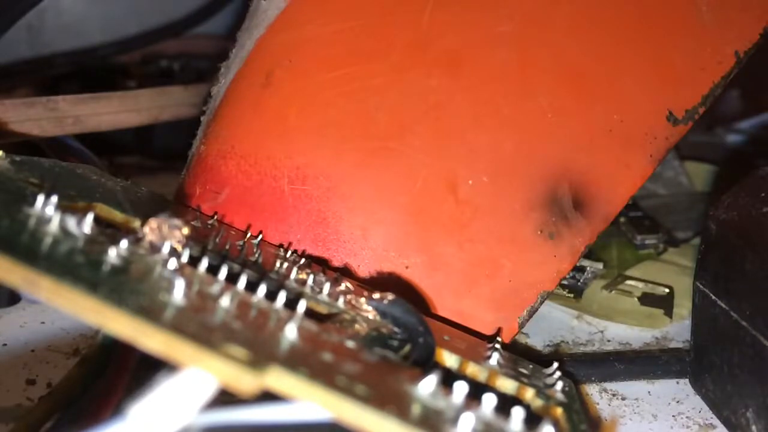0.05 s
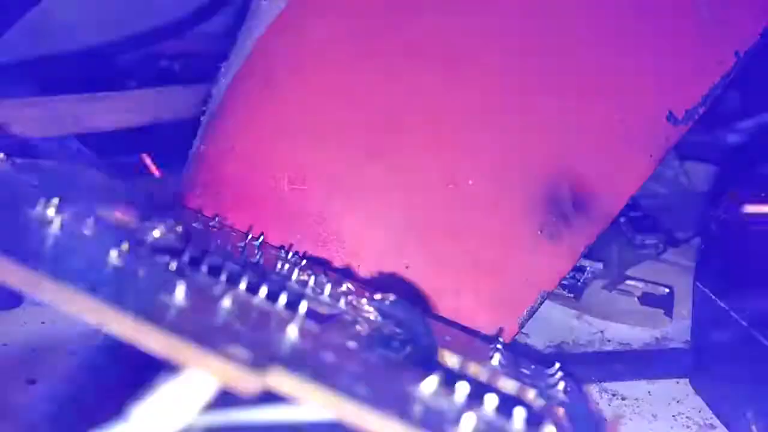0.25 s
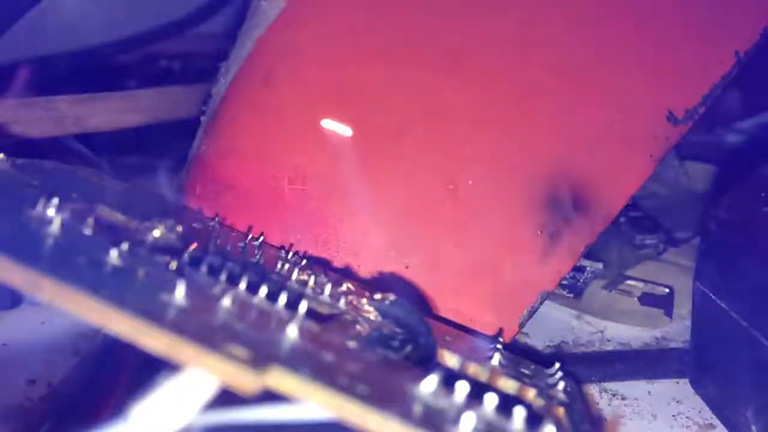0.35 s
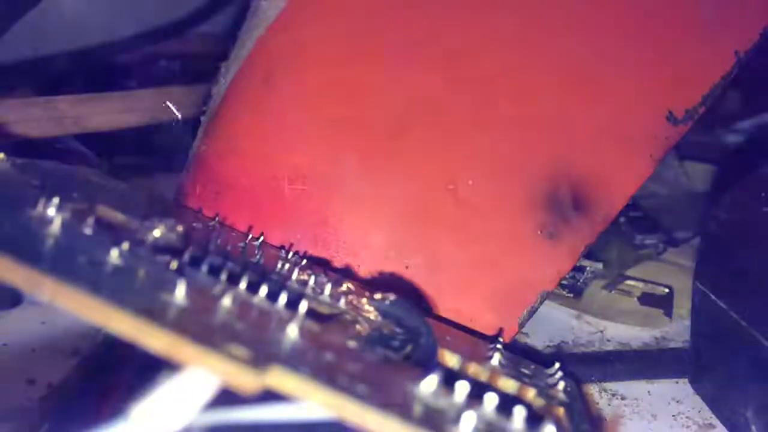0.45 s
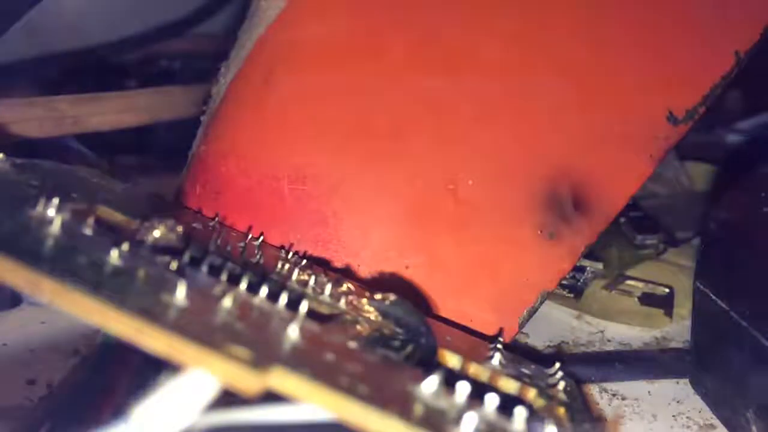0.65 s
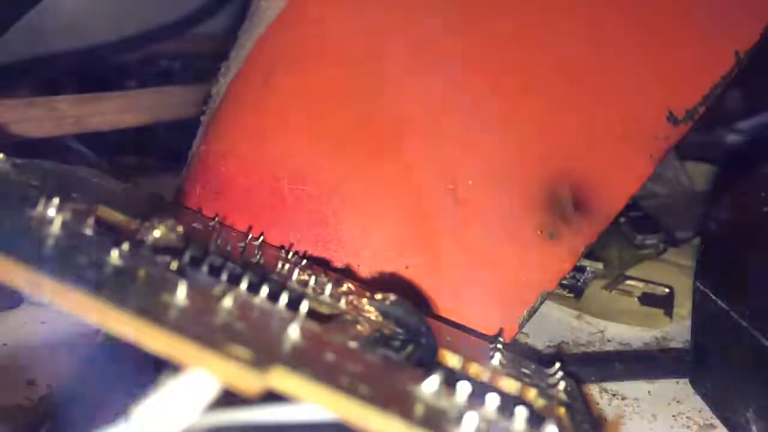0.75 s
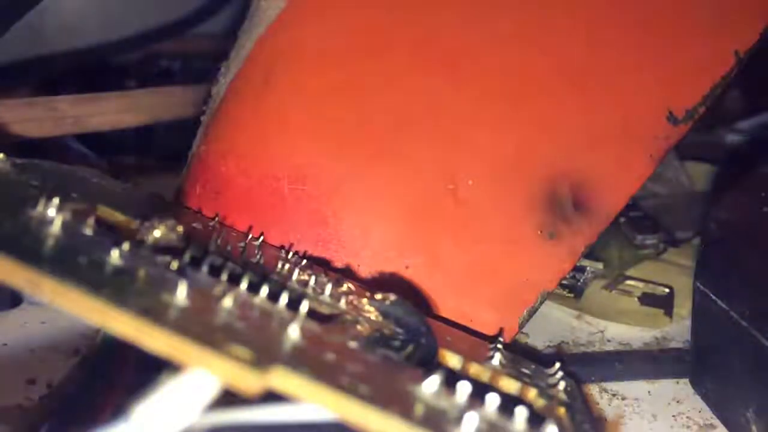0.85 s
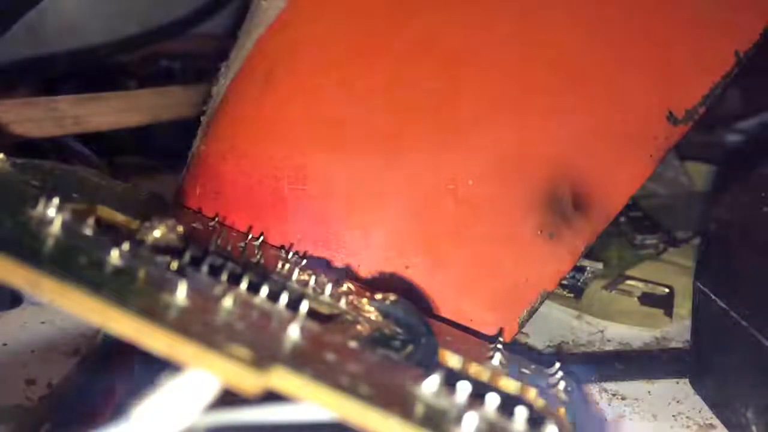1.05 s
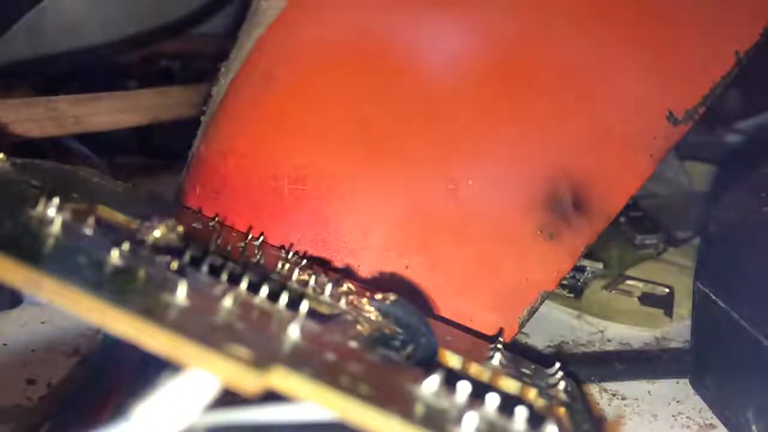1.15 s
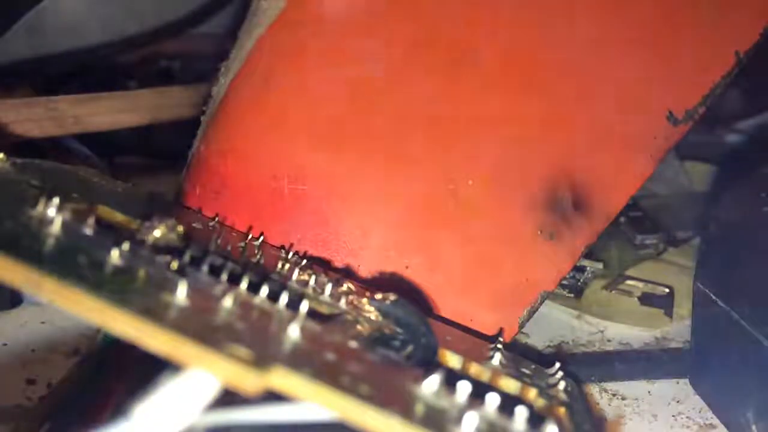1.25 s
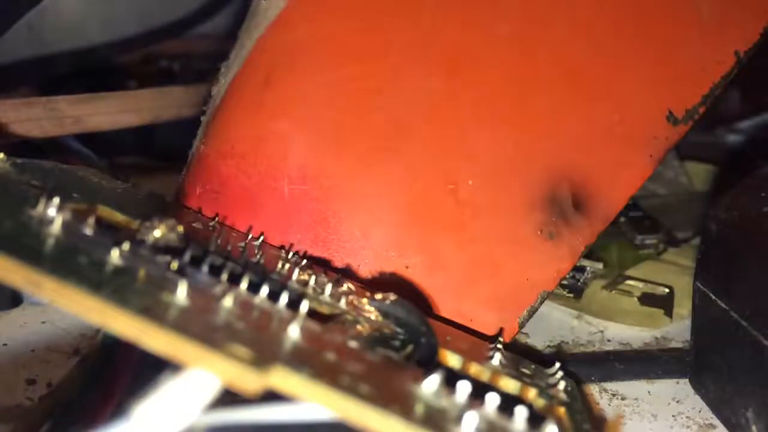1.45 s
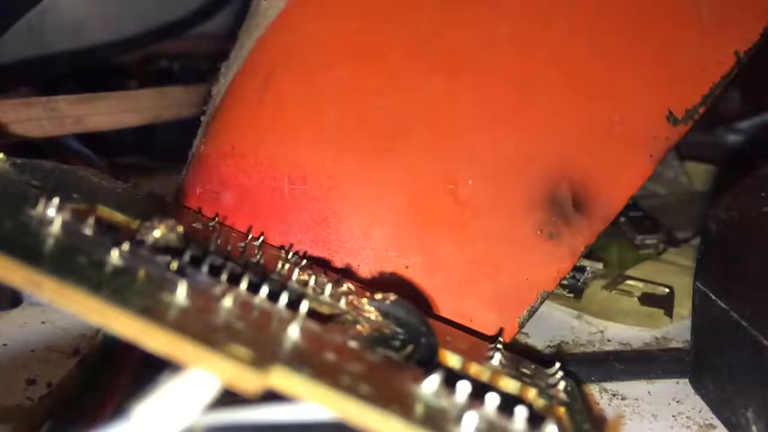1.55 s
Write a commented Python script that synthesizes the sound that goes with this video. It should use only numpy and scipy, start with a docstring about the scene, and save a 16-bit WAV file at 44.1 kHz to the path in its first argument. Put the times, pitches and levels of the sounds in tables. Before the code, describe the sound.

A loud electrical bang hits close by at about 0.25 seconds: a brief fizz, then a tenth of a second of sizzling snaps with a low puff and ringing metal. A large room booms, with dull echoes near 0.45 and 0.65 seconds and a fading rumble. Faint hand rustles come around 1 second, light plastic taps at 1.3, and a dull rub leads to quick bumps near 1.6.

```python
"""A circuit board shorts out close to the microphone. The heating contact fizzes and pushes out hot air,
then six arcs flash within a tenth of a second, each a pressure snap and a sizzle that sets the metal
chassis ringing. A large room answers with reverberation, booming standing waves, two dull echoes and a
rumble. As these fade, a hand rustles on the casing, taps a plastic part, shifts and pushes the housing,
and ends with four quick bumps."""
import sys
import numpy as np
from scipy import signal
from scipy.io import wavfile

SR = 44100
rng = np.random.default_rng(int(sys.argv[2]) if len(sys.argv) > 2 else 0)


def unload_audio(sound):
    """Save the sound as a 16-bit wav file, at the path given as the first command line argument."""
    columns = np.transpose(np.atleast_2d(sound))
    # keep every value between -1 and 1, then stretch to whole-number steps
    steps = np.round(np.clip(columns, -1, 1) * 32767)
    wavfile.write(sys.argv[1], SR, steps.astype(np.int16))


N = 70560
TIME = np.arange(N) / SR
EDGES_HZ = 20 * 2 ** (np.arange(30) / 3)  # third octaves
CENTRES_HZ = np.sqrt(EDGES_HZ[1:] * EDGES_HZ[:-1])
ATTACK_S = 0.0003
ROOM_START_S, ROOM_RISE_S = 0.26, 0.09

# arc flashes: start_s, burn_s, sizzle_db, sizzle_t60_s, snap_db, chassis_db
FLASHES = [(.2472, 0.0099, -11.5, .045, -6.5, -32), (0.2736, 0.0046, -16, .07, -3.5, -33),
           (0.2818, .006, -15, 0.16, -13, -24.5), (0.2979, .001, -19, .04, -2.5, -26),
           (0.3147, 0.00075, -14, 0.01, -8.5, -34), (.3326, 0.0034, -14, .16, -2.5, -11.5)]


def from_db(db):
    """Amplitude grows tenfold for every 20 dB."""
    return 10 ** (np.asarray(db) / 20)


def per_band(table, column=1):
    """Interpolation in log frequency reads a table column at the band centres."""
    table = np.array(table)
    return np.interp(np.log(CENTRES_HZ), np.log(table[:, 0]), table[:, column])


def noise_bands():
    """A filter bank divides white noise into third-octave bands, each of rms 1."""
    white = rng.standard_normal((2, N + 8000))  # extra samples let the filters settle
    bands = []
    for k in range(len(CENTRES_HZ)):
        bandpass = signal.butter(2, EDGES_HZ[k:k + 2], "band", fs=SR, output="sos")
        bands.append(signal.sosfilt(bandpass, white[k % 2])[-N:])
    return np.array(bands) / np.std(bands, axis=1, keepdims=True)


def band_gains(spectrum, loss_db_per_octave=0):
    """Band power is spectral density times bandwidth; the gains are scaled to a total power of 1."""
    density_db = per_band(spectrum) - loss_db_per_octave * np.log2(CENTRES_HZ)
    gain = from_db(density_db) * np.sqrt(CENTRES_HZ)
    return gain / np.linalg.norm(gain)


def noise(spectrum):
    """Weighted bands add in power to coloured noise with an rms near 1."""
    return band_gains(spectrum) @ noise_bands()


def flicker(rate_hz, depth_db):
    """Random amplitude modulation: a wavering gain of rms 1."""
    lowpass = signal.butter(2, rate_hz, fs=SR, output="sos")
    drift = signal.sosfilt(lowpass, rng.standard_normal(N))
    gain = from_db(depth_db * drift / drift.std())
    return gain / np.sqrt(np.mean(gain ** 2))


def envelope(start_s, rise_s, hold_s, t60_s):
    """A linear rise and a hold lead to exponential decay, 60 dB in t60_s."""
    rise = np.clip((TIME - start_s) / rise_s, 0, 1)
    release_s = np.maximum(TIME - start_s - rise_s - hold_s, 0)
    return rise * np.exp(-np.log(1000) * release_s / t60_s)


def pulse(start_s, width_s):
    """A pressure pulse, high-passed so that a shallow rebound follows it."""
    age = np.maximum(TIME - start_s, 0) / width_s
    pressure = 1e-18 - age * np.exp(1 - np.minimum(age, 60))
    return signal.sosfilt(signal.butter(2, 70, "high", fs=SR, output="sos"), pressure)


def ring(start_s, pitch_hz, t60_s, rise_s):
    """A damped mode: a sinusoid that builds up and decays exponentially."""
    age_s = np.maximum(TIME - start_s, 0)
    build_up = 1 - np.exp(-age_s / rise_s)
    return np.sin(2 * np.pi * pitch_hz * age_s) * build_up * np.exp(-np.log(1000) * age_s / t60_s)


def near_panels(direct):
    """Comb filtering: reflections off nearby panels give a hollow colour, here at unchanged rms."""
    # panel reflections: delay_s, level_db
    panels = [(.00066, -23), (.0023, -9), (.0047, -12.5), (.0083, -11.5)]
    mixed = direct + sum(from_db(db) * np.interp(TIME - delay_s, TIME, direct, left=0)
                         for delay_s, db in panels)
    return mixed * direct.std() / mixed.std()


def background():
    """A steady, low noise floor; faint white hiss enters with the reverberation and stays."""
    # noise floor spectrum: frequency_hz, density_db
    spectrum = [(25, -17), (66, 4.5), (130, -11.5), (250, -19.5), (800, -20.5), (2000, -34), (5000, -38),
                (16000, -43.5)]
    floor = from_db(-61.5) * noise(spectrum)
    hiss = envelope(ROOM_START_S, ROOM_RISE_S, hold_s=N / SR, t60_s=1) * rng.standard_normal(N)
    return floor + from_db(-82) * hiss


def heating_contact():
    """Resistive heating makes the contact spit faintly and fizz."""
    # course of the fizz: time_s, level_db
    levels = [(.222, -100), (.225, -41.5), (.232, -42), (.239, -20.5), (.247, -35), (.26, -100)]
    # fizz spectrum: frequency_hz, density_db
    spectrum = [(60, -5), (300, -3), (900, -4), (1800, -19), (2600, -13), (3300, -26.5), (4200, -46),
                (16000, -53.5)]
    spit = from_db(-48.5) * envelope(0.224, ATTACK_S, hold_s=0, t60_s=0.2) * rng.standard_normal(N)
    fizz = from_db(np.interp(TIME, *np.transpose(levels))) * noise(spectrum)
    return spit + fizz


def hot_air_puff():
    """Thermal expansion pushes air against the microphone as low-frequency noise."""
    # puff spectrum: frequency_hz, density_db
    spectrum = [(20, -18.5), (35, -5), (65, -2), (120, 1.5), (200, -10), (450, -24), (1500, -54)]
    return from_db(-21) * envelope(0.2274, rise_s=0.025, hold_s=0.07, t60_s=0.12) * noise(spectrum)


def arc_flashes():
    """Sudden heating launches a pressure snap from each arc; their incoherent sizzles add in power."""
    # sizzle spectrum: frequency_hz, density_db
    spectrum = [(60, -18), (200, -13), (520, -8), (850, -0.5), (1100, -8.5), (1500, -7.5), (3000, -14.5),
                (5000, -15.5), (7500, -14.5), (12000, -18), (16000, -17.5)]
    snaps = burn_power = 0
    for start_s, burn_s, sizzle_db, t60_s, snap_db, _ in FLASHES:
        snaps += from_db(snap_db) * pulse(start_s, width_s=0.0003)
        burn_power += (from_db(sizzle_db) * envelope(start_s, ATTACK_S, burn_s, t60_s)) ** 2
    sputter = flicker(rate_hz=450, depth_db=2.5)
    return snaps + np.sqrt(burn_power) * sputter * near_panels(noise(spectrum))


def chassis_ring():
    """Free vibration: every flash excites the same natural modes of the metal chassis."""
    # chassis modes: pitch_hz, relative_db, t60_s
    modes = [(163.2, -2, 0.18), (250.7, -3.5, .22), (307, 1.5, .28), (346, -2.5, .26), (383.2, -3.5, .25),
             (442, -6.5, 0.15), (522, -8.5, 0.23), (758, -7, 0.24), (865.7, -6.5, 0.16), (1270, -9.5, 0.16),
             (1365, -4.5, 0.16), (1484, -15.5, .14), (1645, -12.5, .14), (2187, -19, 0.13)]
    return sum(from_db(chassis_db + mode_db) * ring(start_s, pitch_hz, t60_s, rise_s=0.015)
               for start_s, *_, chassis_db in FLASHES for pitch_hz, mode_db, t60_s in modes)


def reverberation():
    """The room's diffuse field decays by absorption, faster in the treble than in the bass."""
    # reverberant spectrum: frequency_hz, density_db, t60_s
    tail = [(30.06, -33.5, 2.1), (79.3, -16.5, 1.8), (168, -4.5, 2.4), (337, -1.5, 1.29), (620, -9, 1.1),
            (1210, -11.5, 1.1), (2000, -26, 0.33), (3500, -48, .6), (7000, -48, .45), (16330, -59, 0.31)]
    decays = np.array([envelope(ROOM_START_S, ROOM_RISE_S, 0, t60_s)
                       for t60_s in per_band(tail, column=2)])
    return from_db(-31.5) * band_gains(tail) @ (decays * noise_bands())


def standing_waves():
    """Resonance between the walls: low room modes build up and boom."""
    # room modes: start_s, pitch_hz, level_db, t60_s, rise_s
    modes = [(0.301, 134.7, -26.5, 0.74, .03), (0.438, 184.8, -25.5, 0.54, 0.048),
             (.44, 330, -29, 0.62, 0.023), (.5, 206.7, -35.5, 0.71, 0.024),
             (0.639, 126.9, -31.5, 2.06, 0.079), (.67, 183.2, -32, 1.2, 0.022),
             (0.661, 286.1, -46, 2.0, .04)]
    return sum(from_db(db) * ring(start_s, pitch_hz, t60_s, rise_s)
               for start_s, pitch_hz, db, t60_s, rise_s in modes)


def wall_echoes():
    """Reflection off the far wall returns two echoes, smeared into noise whose treble dies first."""
    # echo arrivals: start_s, level_db, loss_db_per_octave, t60_s
    arrivals = [(0.443, -33, 0.5, 0.63), (0.651, -45.5, 4.5, 1.52)]
    # echo spectrum: frequency_hz, density_db
    spectrum = [(80, -11.5), (300, 3), (700, 2.5), (1300, -2.5), (1900, -9.5), (2500, -16), (5000, -25.5),
                (10000, -47), (16000, -58)]
    # how long each band lingers: frequency_hz, t60_ratio
    linger = [(300, 1.1), (1500, 1.01), (1950, 0.83), (2500, 0.53), (8000, 0.53)]
    bands, echoes = noise_bands(), 0
    for start_s, db, loss, t60_s in arrivals:
        decays = np.array([envelope(start_s, rise_s=0.0015, hold_s=0.011, t60_s=t60_s * ratio)
                           for ratio in per_band(linger)])
        echoes += from_db(db) * band_gains(spectrum, loss) @ (decays * bands)
    return echoes


def cooling_contact():
    """The cooling contact gives off a brief wisp of high-frequency noise."""
    # wisp spectrum: frequency_hz, density_db
    spectrum = [(3000, -25), (5000, -3), (6500, 3), (8500, -8), (13000, -14), (16000, -23)]
    return from_db(-66) * envelope(0.49, rise_s=0.007, hold_s=0.0068, t60_s=0.12) * noise(spectrum)


def hand_rustles():
    """Friction of the hand makes grainy noise, which the casing's resonances colour."""
    # hand strokes: start_s, rise_s, hold_s, t60_s, level_db, loss_db_per_octave
    strokes = [(.612, 0.0036, .003, 0.061, -70.5, 1), (0.653, 0.0026, .005, 0.15, -73, 1),
               (0.971, 0.036, 0.016, 0.68, -58.5, 1), (1.243, 0.072, 0.12, 0.24, -67.5, 1),
               (1.501, 0.041, 0.029, .2, -55, 1.5)]
    # friction spectrum: frequency_hz, density_db
    spectrum = [(200, -9), (900, 2), (1600, -6.5), (2400, -10), (3800, -7), (6000, -8), (10000, -15),
                (16000, -20)]
    # casing resonances: pitch_hz, bandwidth_hz, gain_db
    resonances = [(2220, 400, 7), (3630, 250, -0.5), (5760, 540, -9)]
    bands = noise_bands()
    friction = sum(from_db(db) * envelope(*timing) * (band_gains(spectrum, loss) @ bands)
                   for *timing, db, loss in strokes)
    friction *= flicker(rate_hz=155, depth_db=1)
    casing = sum(from_db(db) * signal.lfilter(*signal.iirpeak(hz, hz / width_hz, fs=SR), friction)
                 for hz, width_hz, db in resonances)
    return near_panels(friction + casing)


def room_rumble():
    """Low-frequency reverberation rolls back with the second echo."""
    # rumble spectrum: frequency_hz, density_db
    spectrum = [(25, -27), (50, -5), (85, 6), (150, 1), (250, -15), (400, -11.5), (800, -51.5)]
    return from_db(-43.5) * envelope(0.643, rise_s=0.088, hold_s=0.16, t60_s=1.93) * noise(spectrum)


def plastic_taps():
    """Light impacts excite the heavily damped modes of a plastic part."""
    # taps: start_s, level_db
    taps = [(1.294, -50.5), (1.329, -55.5)]
    # modes of the part: pitch_hz, relative_db, t60_s
    modes = [(850, -2.5, 0.063), (917, 3, 0.045), (1010, -14, .08), (3630, -9, 0.019)]
    return sum(from_db(tap_db + mode_db) * ring(start_s, pitch_hz, t60_s, ATTACK_S)
               for start_s, tap_db in taps for pitch_hz, mode_db, t60_s in modes)


def housing_shift():
    """Sliding friction gives a dull rub as the housing shifts; a soft push excites one low mode."""
    # rub spectrum: frequency_hz, density_db
    spectrum = [(40, -18), (130, 8), (330, -4.5), (700, -18), (1400, -45)]
    rub = from_db(-51.5) * envelope(1.425, rise_s=0.0076, hold_s=0.038, t60_s=0.93) * noise(spectrum)
    push = from_db(-33.5) * ring(1.47, pitch_hz=60.4, t60_s=0.21, rise_s=0.033)
    return rub + push


def bumps():
    """Each impact near the microphone radiates a thudding pulse and a scuff of friction noise."""
    # impacts: start_s, thud_db, scuff_db
    impacts = [(1.549, -32.5, -51), (1.5704, -19.5, -33), (1.577, -22.5, -50), (1.595, -30, -25)]
    # scuff spectrum: frequency_hz, density_db
    spectrum = [(30, -20), (100, -17), (300, 9.5), (800, 2.5), (1600, -19.5), (4500, -14), (8500, -13.5),
                (10500, -35), (16000, -22)]
    friction = near_panels(noise(spectrum))
    thuds = scuffs = 0
    for start_s, thud_db, scuff_db in impacts:
        thuds += from_db(thud_db) * pulse(start_s, width_s=0.00052)
        scuffs += from_db(scuff_db) * envelope(start_s, ATTACK_S, hold_s=0, t60_s=0.097) * friction
    return thuds + scuffs


def scene():
    """Superposition: the shorting board, the room and the hand add to the background in one channel."""
    floor = background()
    board = heating_contact() + arc_flashes() + hot_air_puff() + chassis_ring() + cooling_contact()
    room = reverberation() + standing_waves() + wall_echoes() + room_rumble()
    hand = hand_rustles() + plastic_taps() + bumps() + housing_shift()
    return (floor + board + room + hand)[None]


def record(dry):
    """Soft saturation rounds the loudest peaks, and a steep low-pass filter cuts the highest treble."""
    ceiling, cutoff_hz = 0.94, 15900
    rounded = ceiling * np.tanh(dry / ceiling)
    return signal.sosfilt(signal.ellip(10, 0.2, 80, cutoff_hz, fs=SR, output="sos"), rounded)


dry = scene()
out = record(dry)
unload_audio(out)
```